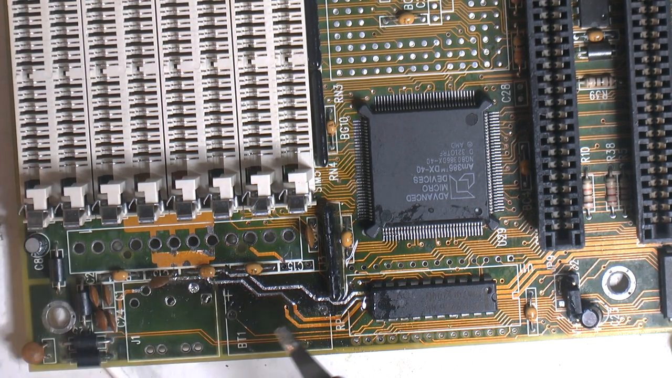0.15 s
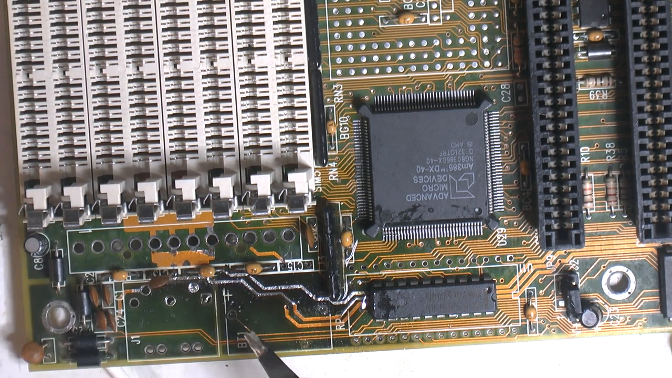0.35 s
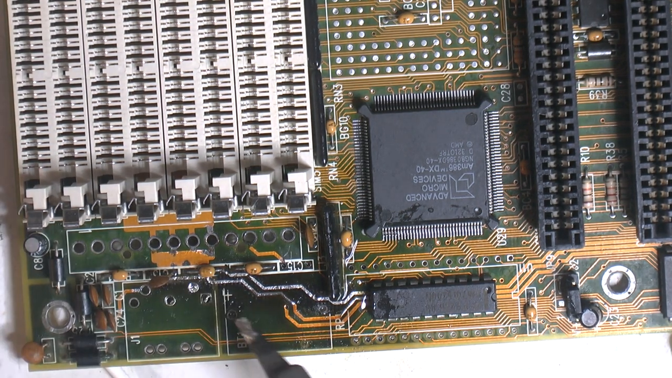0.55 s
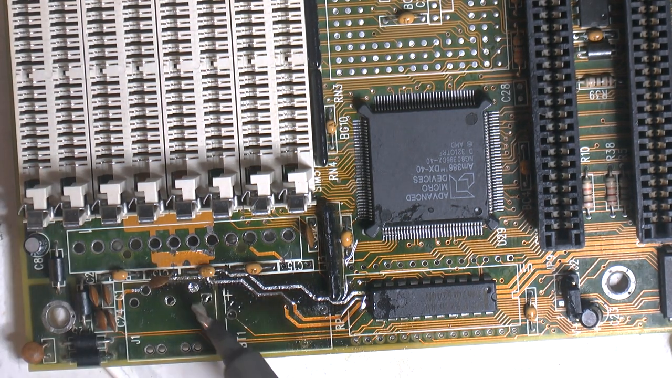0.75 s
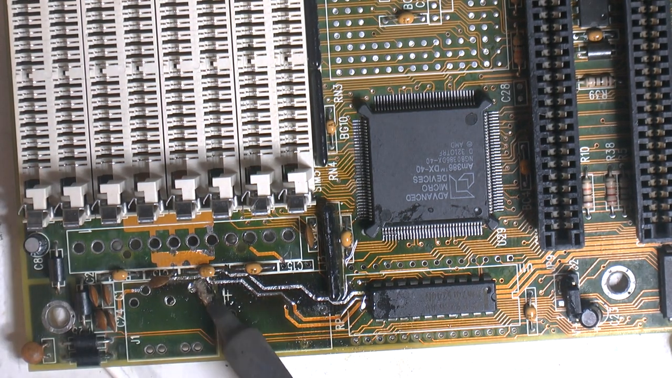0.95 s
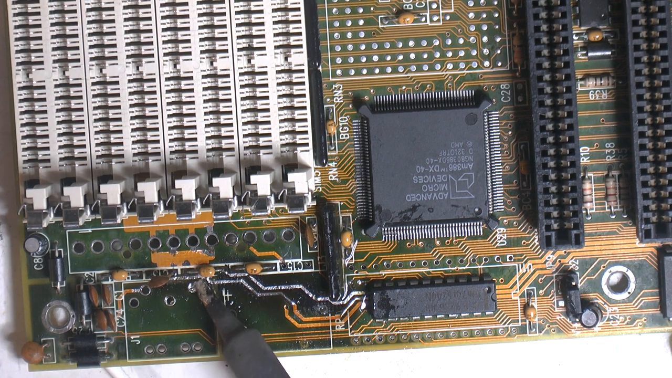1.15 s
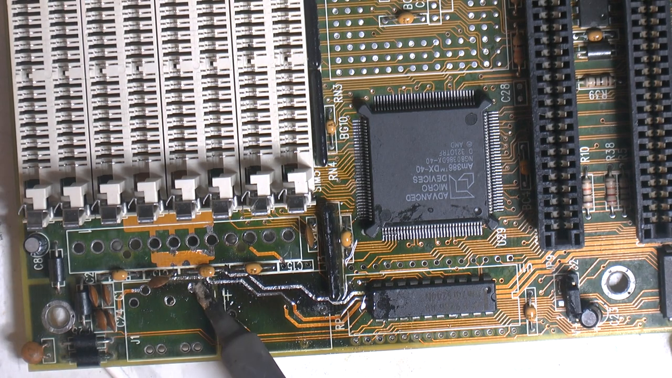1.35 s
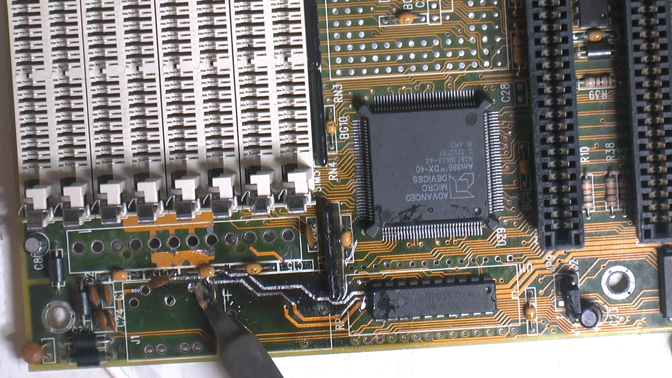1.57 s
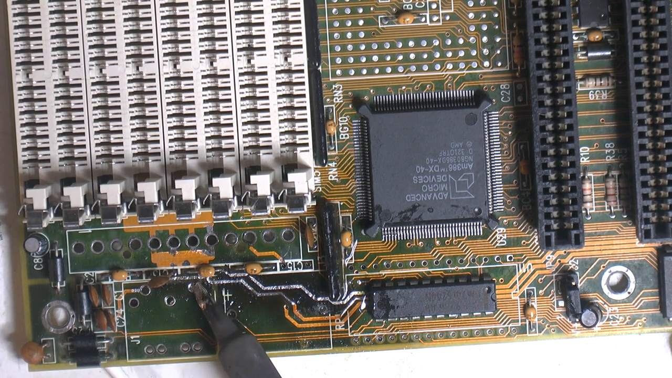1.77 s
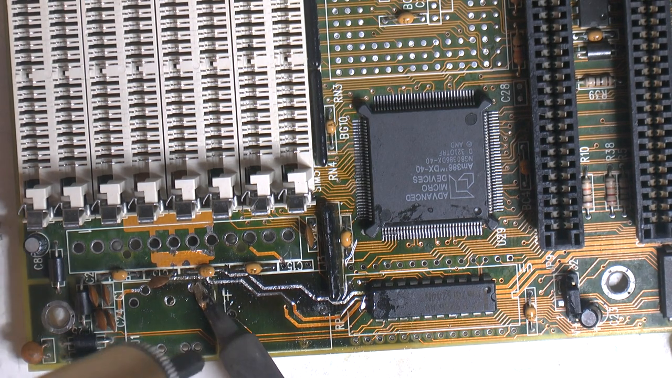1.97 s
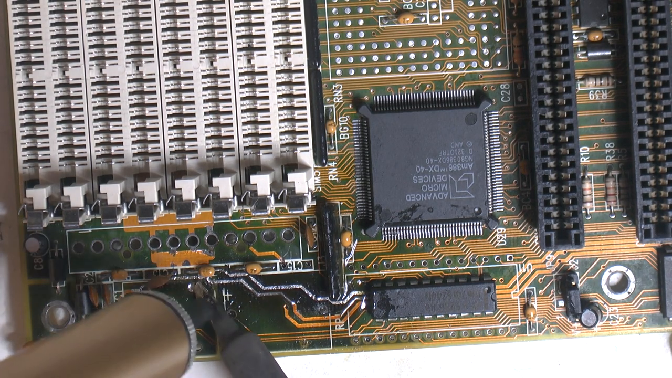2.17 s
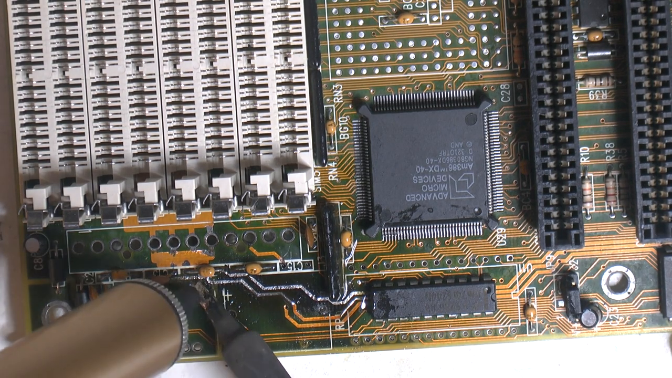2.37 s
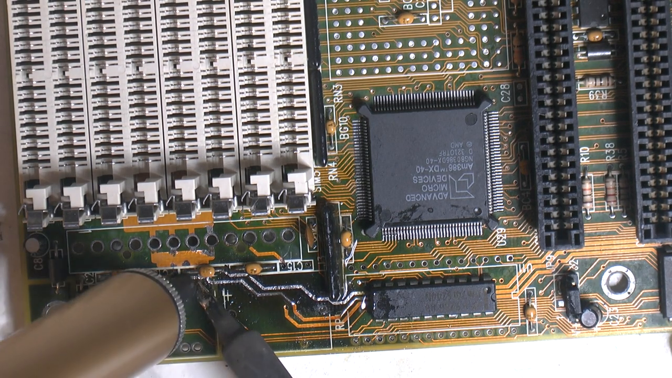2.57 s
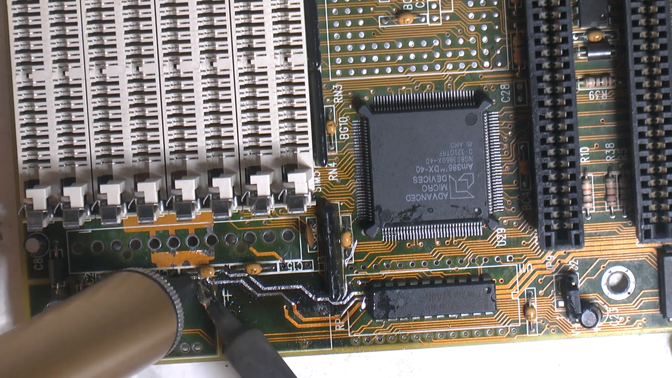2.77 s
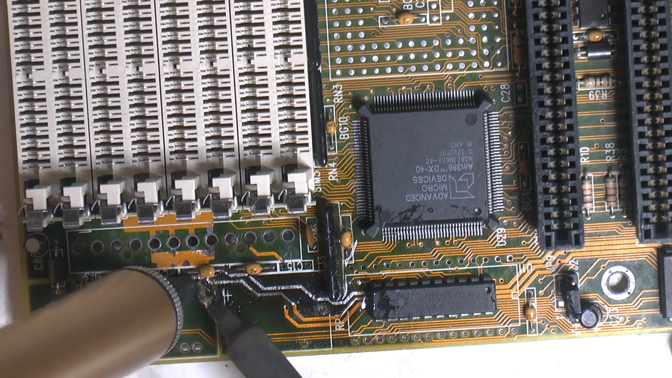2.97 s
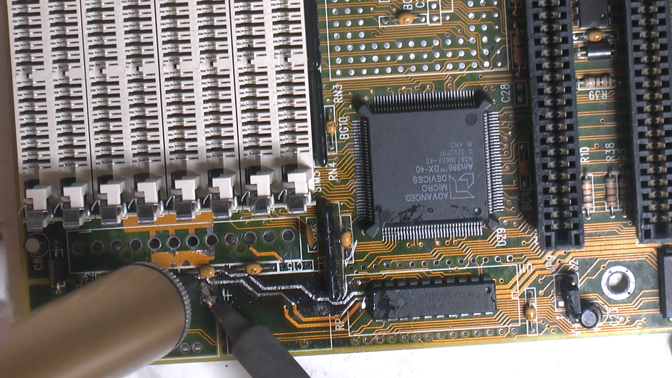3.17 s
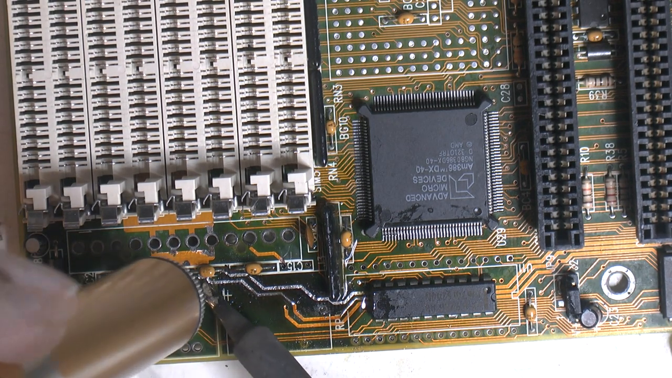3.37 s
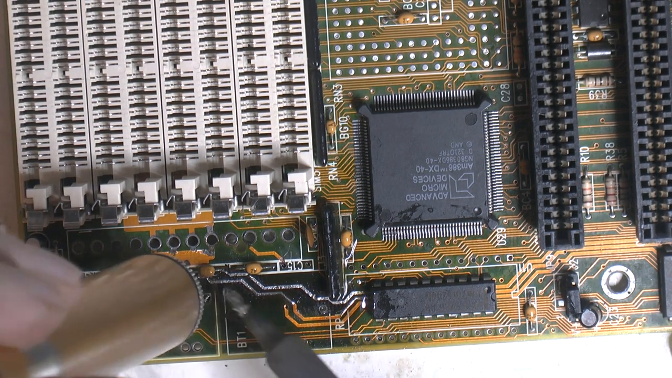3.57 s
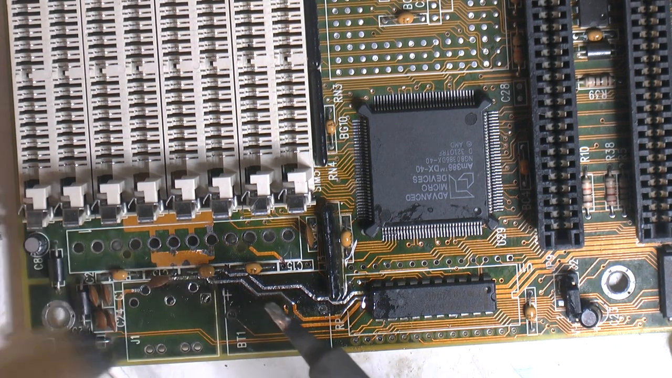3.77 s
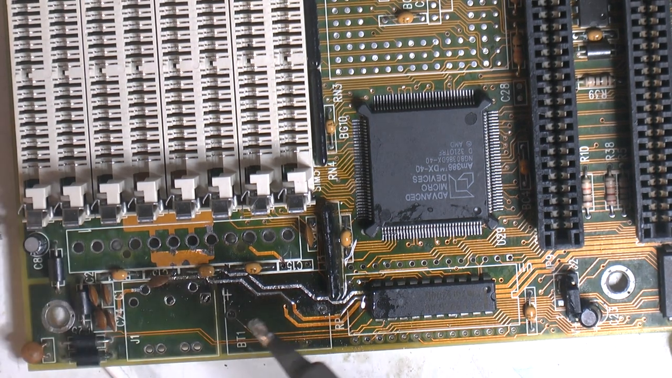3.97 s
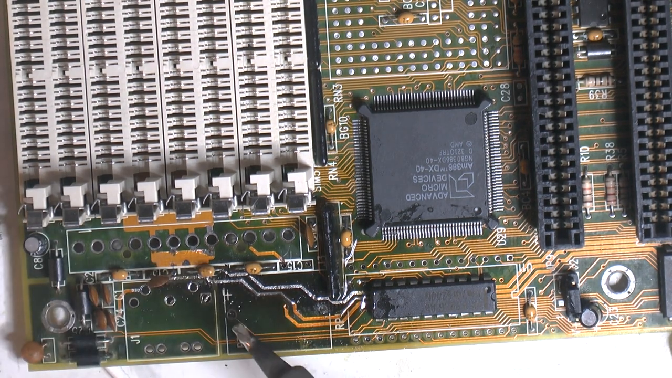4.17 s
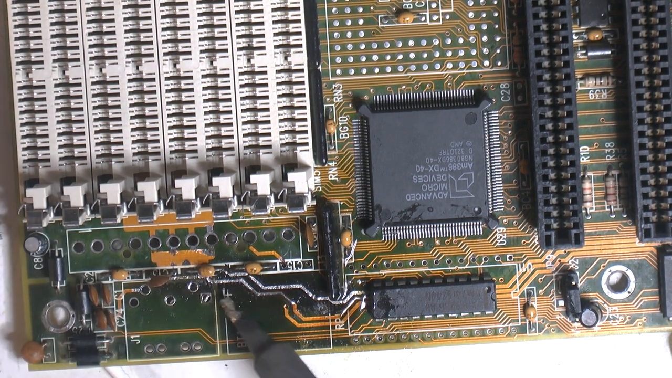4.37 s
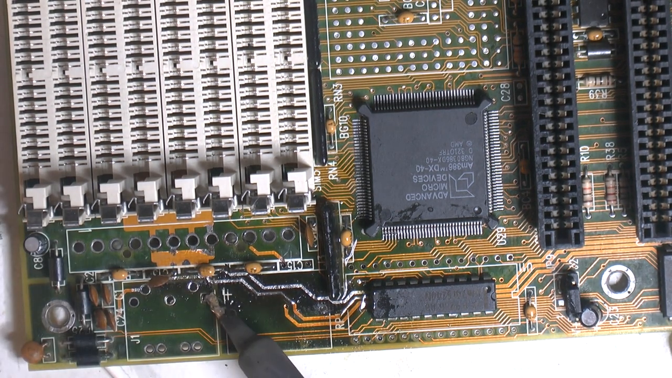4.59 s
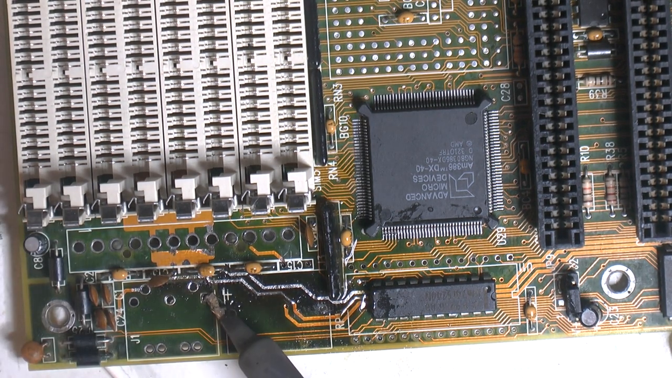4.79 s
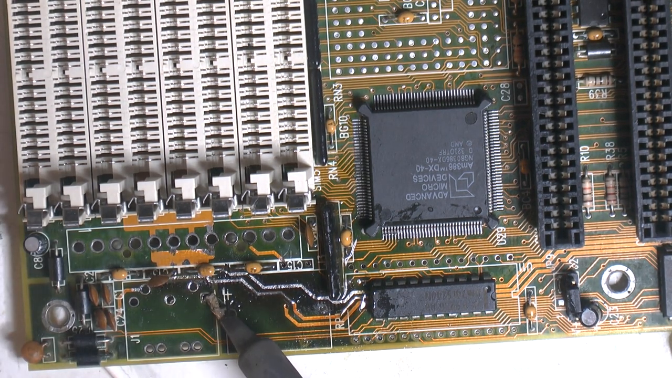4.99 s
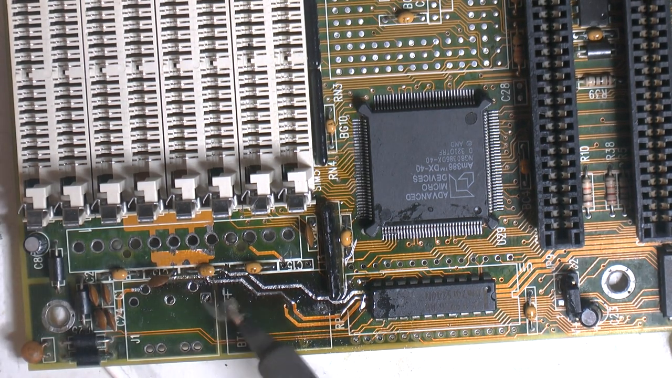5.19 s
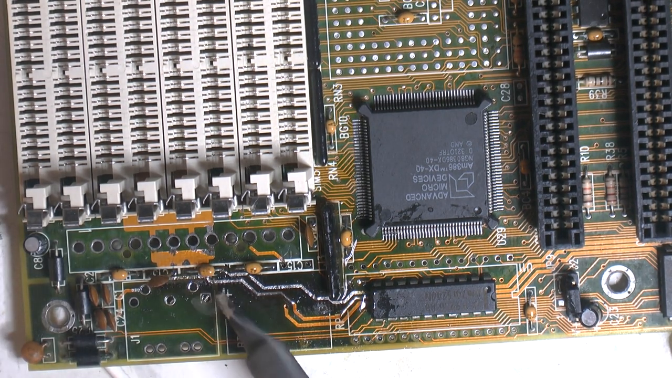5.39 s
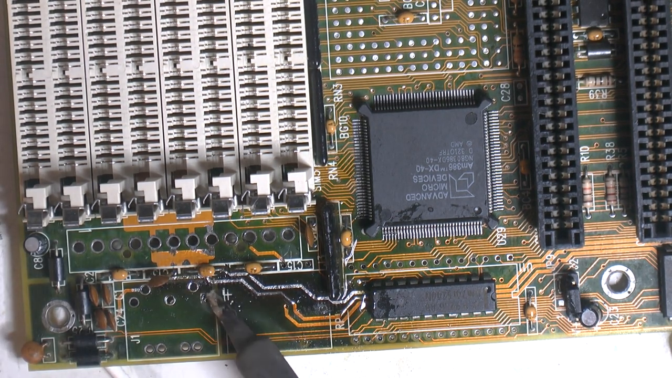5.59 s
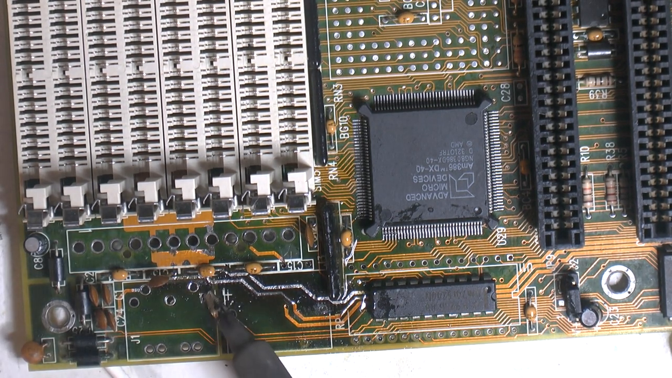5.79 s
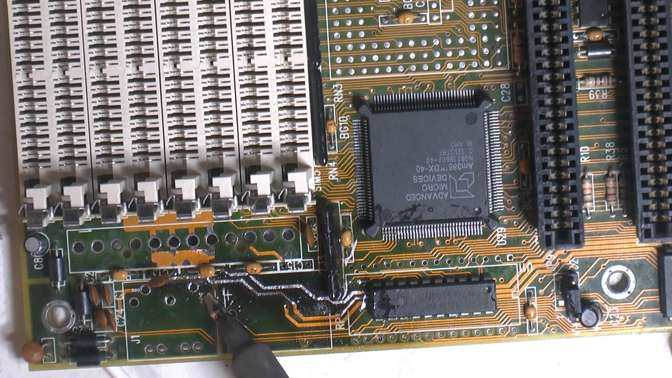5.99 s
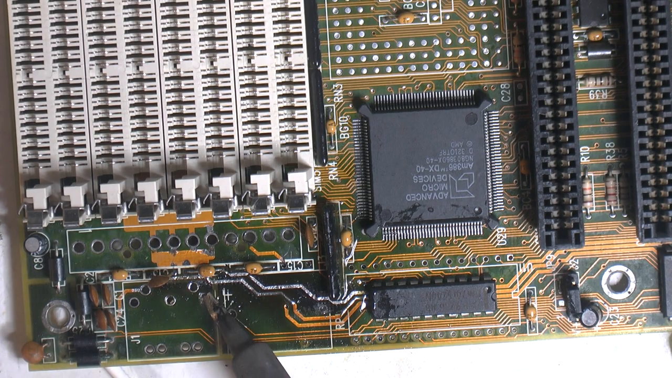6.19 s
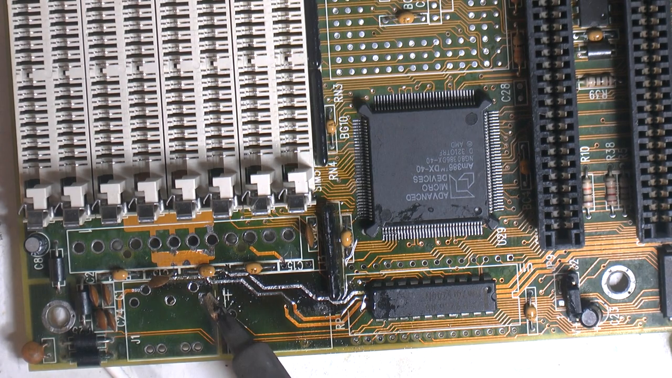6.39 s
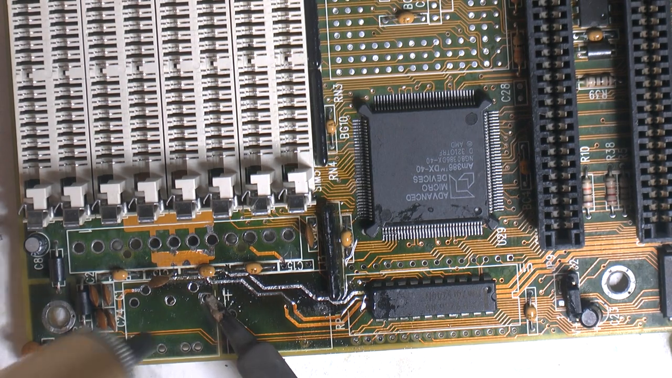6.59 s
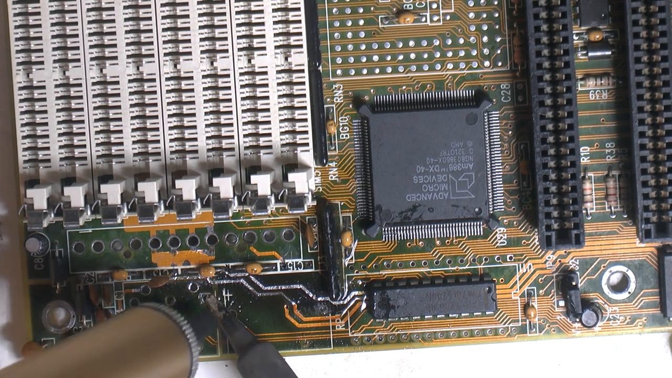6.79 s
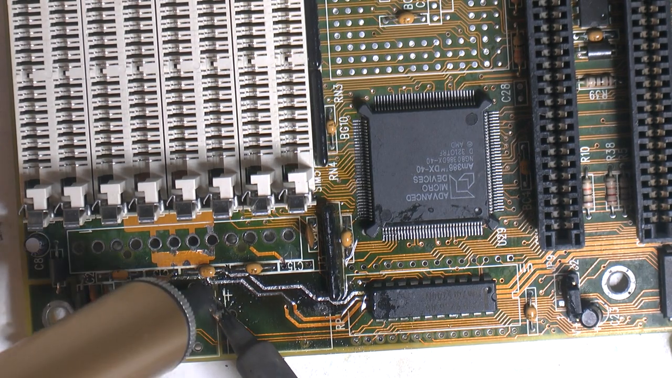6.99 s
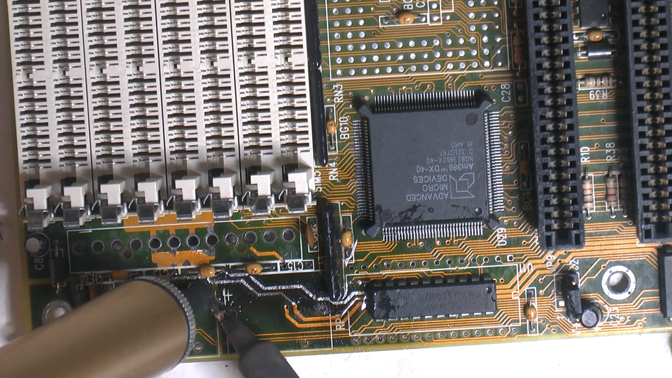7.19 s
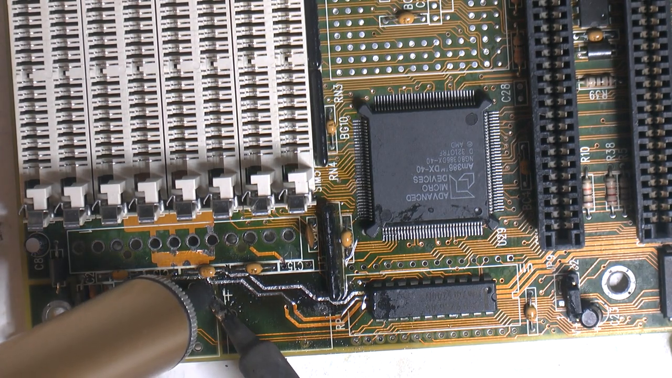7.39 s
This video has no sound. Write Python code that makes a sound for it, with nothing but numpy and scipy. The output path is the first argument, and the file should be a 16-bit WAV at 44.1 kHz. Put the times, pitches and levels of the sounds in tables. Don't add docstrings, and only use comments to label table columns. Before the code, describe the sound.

Close plastic-and-metal latch click, small tool ticks, a violent double snap with heavy bench thump, then thuds and another click, in a quiet humming room.

```python
import sys
import numpy as np
from scipy import signal
from scipy.fft import rfft, irfft
from scipy.io import wavfile
from scipy.ndimage import uniform_filter1d

SR = 44100
rng = np.random.default_rng(int(sys.argv[2]) if len(sys.argv) > 2 else 0)


def inscribe(sig):
    pcm = np.round(np.clip(np.atleast_2d(sig).T, -1, 1) * 32767)
    wavfile.write(sys.argv[1], SR, pcm.astype(np.int16))


def invert_db(x):
    u = np.asarray(x, float) / 20
    return 10 ** u


N = 328545
T = np.arange(N) / SR


def level(x, db):
    return x * invert_db(db) / np.sqrt(np.mean(x ** 2))


def band(x, hz, width):
    return signal.lfilter(*signal.iirpeak(min(hz, SR / 2.2), hz / width, fs=SR), x)


def steep(x, hz, width):
    return band(band(x, hz, width), hz, width)


def fade(t, t60):
    return np.exp(-np.log(1000) * t / t60)


def tone(hz):
    return np.sin(2 * np.pi * np.cumsum(hz) / SR)


def add(out, s, x):
    i = int(s * SR)
    out[i:i + len(x)] += x[:N - i]


def curve(rows, column):
    rows = np.array(rows)
    inside = (T >= rows[0, 0]) & (T <= rows[-1, 0])
    return inside * invert_db(np.interp(T, rows[:, 0], rows[:, column]))


def walk(rate):
    k = int(SR / rate)
    return uniform_filter1d(np.repeat(rng.standard_normal(N // k + 1), k), k)[:N]


# f/Hz, level/dB
HUM_TONES = [(193.8, -64.5), (339.1, -66), (899.0, -76.5), (1319, -82), (1798, -87.5)]
# f/Hz, level/dB
HISS_SPECTRUM = [(88, -26), (150, -6.5), (259, -10.5), (346, -9), (389, -13.5), (574, -17), (784, -17.5),
                 (898, -16.5), (1030, -19), (1550, -24), (3000, -24.5), (4180, -29.5), (15700, -34.5)]


def background():
    hum = sum(invert_db(db + 1.0 + 6.4 * walk(36)) * tone(hz + 2.3 * walk(6.7)) for hz, db in HUM_TONES)
    hz, db = np.transpose(HISS_SPECTRUM)
    f = np.fft.rfftfreq(N, 1 / SR)
    gain = invert_db(np.interp(np.log(f + 1), np.log(hz), db))
    hiss = irfft(rfft(rng.standard_normal(N)) * gain, N)
    return hum + level(hiss, -62.5)


# t/s, level/dB
HAND_WEIGHT = [(0, 14.5), (.35, -2), (.5, -6), (1.2, -3), (1.4, 9), (1.55, -3), (2.4, -3.5), (3.0, -5),
               (3.5, 0), (3.65, 18), (3.95, 10.5), (4.3, -1), (5.4, 0), (5.75, 6), (6.2, 7.5), (6.45, -4),
               (7.2, -2), (7.45, 6)]
# t/s, level/dB
FLOOR_DRONE = [(0, 4.5), (.7, 6.5), (1.1, 3), (2.0, -3), (2.4, -8), (3.5, -6.5), (4.1, 6.5), (4.7, 3.5),
               (5.1, 0), (7.45, -7.5)]
REST_LEVELS = (-49, -54.5, -52, -55.5)
HAND_FOLLOW = (0.95, 0.11, .2, .1)
DRONE_FOLLOW = (.1, 0.82, 0.081, 0.95)


def tremble():
    sway_db, sway_share, sway_lag_s = -24.5, 0.6, 0.029

    def ring(hz, width):
        return level(steep(rng.standard_normal(N), hz, width), 0)

    top = ring(132, 12) + invert_db(-8.5) * ring(215, 40) + invert_db(-17.5) * ring(460, 90)
    stand = ring(102, 12)
    leg = invert_db(2 + 1.2 * walk(5.9)) * tone(62.5 + 1.2 * walk(2.7))
    leg += invert_db(-6) * ring(55, 16)
    sway = ring(28, 14)
    hands_db = np.interp(T, *np.transpose(HAND_WEIGHT))
    drone_db = np.interp(T, *np.transpose(FLOOR_DRONE))

    swell = np.zeros(N)
    for s, db, *_ in WORK_BLOWS + PUSH_BLOWS + RECOIL_BLOWS:
        t = np.maximum(T - s, 0) / sway_lag_s
        swell = np.maximum(swell, invert_db(sway_db + sway_share * db) * t * np.exp(1 - t))

    out = swell * sway
    for rest_db, hand, drone, x in zip(REST_LEVELS, HAND_FOLLOW, DRONE_FOLLOW, (sway, leg, stand, top)):
        out += invert_db(rest_db + hand * hands_db + drone * drone_db) * x
    return out


# f/Hz, t60/s, level/dB
ROOM_BANDS = [(308, 0.33, -6.5), (700, 0.32, 7), (1390, 0.53, 1.5), (2980, .55, -2.5), (6000, .5, -3),
              (9900, 0.19, -6.5), (14000, 0.27, -1)]


def room(x):
    wall_s, wall_db = 0.03, 6
    t = T[:SR]
    tail = np.zeros(SR)
    for hz, t60, db in ROOM_BANDS:
        noise = level(band(rng.standard_normal(SR), hz, hz * 0.7), 0)
        tail += invert_db(db) * fade(t, t60) * noise * np.sqrt(hz)
    tail *= 1 - np.exp(-t / 0.0013)
    tail *= invert_db(wall_db * np.exp(-((t - wall_s) / 0.001) ** 2))
    return signal.fftconvolve(x, tail / np.sqrt(np.sum(tail ** 2)))[:N]


# t/s, peak level/dB, centre f/Hz
TOOL_TICKS = [(0.0762, -48, 7900), (0.5331, -30, 2786), (0.9938, -32, 4870), (1.3294, -59, 3570),
              (1.722, -48.5, 4790), (2.6434, -41, 7340), (2.8517, -59, 3140), (3.1283, -47, 7400),
              (3.1762, -49.5, 5530), (3.9972, -51, 3030), (4.157, -48, 3950), (4.1769, -42.5, 4800),
              (4.349, -50, 2930), (4.4169, -34, 3860), (4.4687, -31, 3820), (5.3981, -49, 7700),
              (5.5582, -45.5, 4500), (5.9372, -43.5, 6410), (6.0702, -54.5, 2950), (6.2294, -53.5, 2950),
              (6.809, -54.5, 3040)]


def ticks():
    out, t = np.zeros(N), T[:SR // 2]
    for s, db, hz in TOOL_TICKS:
        x = steep(rng.standard_normal(len(t)) * fade(t, 0.015), hz, hz * 1.5)
        add(out, s, invert_db(db) * x / np.abs(x).max())
    return out


# t/s, peak level/dB, f/Hz, t60/s
METAL_RINGS = [(2.643, -60, 7340, .04), (3.4797, -54, 4800, .015), (3.4797, -52, 7370, .02),
               (3.4797, -54, 6000, .012), (3.4797, -56, 9800, .012), (3.54, -33, 5400, .35),
               (3.54, -36, 4300, .3), (4.123, -58, 7950, .03), (4.178, -57, 4780, .03),
               (4.4195, -42, 3860, .2), (4.4195, -50, 9000, .08), (4.4195, -42, 5500, .02),
               (4.5575, -34, 6450, .2), (4.5575, -34, 6650, .3), (5.399, -62, 7630, .05)]


def metal_rings():
    out, t = np.zeros(N), T[:SR // 2]
    for s, db, hz, t60 in METAL_RINGS:
        onset = 1 - np.exp(-t / 0.00045)
        add(out, s, invert_db(db) * fade(t, t60) * onset * np.sin(2 * np.pi * hz * t))
    return invert_db(5.0 * walk(200)) * out


# start t/s, length t/s, first level/dB, last level/dB, treble level/dB
RUBS = [
    (0.0, .14, -50, -73.5, -23.5),
    (0.43, 0.11, -63, -56, 0.5),
    (0.521, .095, -44.5, -45, -7.5),
    (3.184, .08, -65, -81, -6),
    (4.041, .11, -74, -67.5, -5),
    (4.384, .03, -67, -59.5, -8.5),
    (4.414, .137, -50.5, -44, -5),
    (5.344, .055, -69, -65, -14),
    (5.394, .075, -69, -82, 0),
]
# f/Hz, width f/Hz, level/dB
RUB_MODES = [(2400, 840, -2.5), (3300, 880, 1.5), (4140, 960, 0.5), (6550, 1500, 1)]


def slides():
    rub = rng.standard_normal(N) * invert_db(3.8 * walk(150))
    body = level(sum(invert_db(d) * band(rub, f, w) for f, w, d in RUB_MODES), -2)
    treble = level(band(rub, 12000, 7000), 0.99)
    out = np.zeros(N)
    for s, length, first_db, last_db, treble_db in RUBS:
        envelope = curve([(s, first_db), (s + length, last_db)], column=1)
        attack = np.clip((T - s) / 0.012, 0, 1)
        out += envelope * attack * (body + invert_db(treble_db) * treble)
    return out


# t/s, level/dB
SUCTION = [
    (3.4975, -49),
    (3.501, -29),
    (3.506, -16),
    (3.536, -19.5),
    (3.545, -22),
    (3.56, -31.5),
]


def suction():
    return curve(SUCTION, column=1) * level(band(rng.standard_normal(N), 8500, 9000), 0)


# f/Hz, level/dB, t60/s
STAND_MODES = [(108.06, 5, 0.22), (105.18, -14, 0.5)]
TOP_MODES = [(141.6, 0, 0.32)]
UPPER_MODES = [(194.25, 2.5, .15), (216.9, -1, .13)]
KNOCK_MODES = [(331, -7.5, 0.12), (419, -3, 0.051), (479, 0.5, 0.032), (498.3, 1.5, 0.011), (595, -12, .04)]
MODE_RISE = (0.017, 0.0092, 0.0081, 0.0025)
# f/Hz, width f/Hz, level/dB
BOARD_MODES = [(766, 150, 7), (893, 83, 2), (900, 500, -0.5), (1430, 130, -3), (1790, 390, -7.5)]


def thuds(rows, sign, soft, loose_db):
    (bench, board), t = np.zeros((2, N)), T[:SR // 2]
    groups = STAND_MODES, TOP_MODES, UPPER_MODES, KNOCK_MODES
    for s, db, weight_db, place, hard_db in rows:
        turn = np.clip(place, 0, 1) * np.pi / 2
        weight = invert_db(weight_db)
        gains = weight * np.cos(turn), weight * np.sin(turn), 1, invert_db(hard_db)
        for gain, modes, rise in zip(gains, groups, MODE_RISE):
            ring = sum(invert_db(d) * fade(t, t60) * np.sin(2 * np.pi * f * t) for f, d, t60 in modes)
            onset = 1 - np.exp(-(t / (soft * rise)) ** 2)
            add(bench, s, sign * invert_db(db) * gain * onset * ring)
        chatter = (t == 0) + 0.17 * rng.standard_normal(len(t)) * fade(t, 0.044)
        x = steep(sum(invert_db(d) * band(chatter, f, w) for f, w, d in BOARD_MODES), 1400, 2400)
        add(board, s, invert_db(db + hard_db + loose_db) * x / np.abs(x).max())
    return np.array([bench, board])


# t/s, level/dB, weight level/dB, place [0 at the stand - 1 mid top], hardness level/dB
WORK_BLOWS = [(0.0, -38, 10.5, 0.67, 1), (0.764, -56, 5, 0.27, 25), (0.995, -21, 2, 0.42, -2),
              (1.329, -40, 0, .22, -11), (1.724, -45.5, 1.5, .06, -6), (3.136, -34.5, -20, .37, -20.5),
              (3.764, -32.5, 8.5, 0.8, -28), (4.241, -46, -11, .57, -31.5), (5.17, -37.5, 0.5, 0.84, -8.5),
              (5.2, -38, 0.5, .37, -5), (5.557, -22.5, 0.3, 0.33, -5.5), (5.7, -37, -8, .23, -18),
              (5.735, -30.5, -13, .16, -25), (5.924, -31.5, -17, .66, -18), (5.941, -28.5, -5, .72, -8),
              (6.077, -32, -17, .16, -26), (6.641, -24.5, -19, .6, -19), (7.02, -39, 14, 0.41, -22),
              (7.097, -30, -1.5, 0.93, -26)]


def work_thuds():
    return thuds(WORK_BLOWS, 0.76, soft=0.93, loose_db=-6.5)


PUSH_BLOWS = [(2.607, -44, 24, 1, 9), (2.644, -22.5, -10, 0.12, -20), (2.681, -34.5, -0.5, 0.51, -15),
              (4.469, -29, -12.5, 0.72, -6), (4.499, -27.5, -9.5, 1, -5), (4.42, -25.5, -4, 0.54, 2),
              (4.444, -22.5, -30, .5, -14.5), (4.54, -18, -2.5, 0.69, -5.5), (4.611, -4.5, -3.5, .76, -0.5),
              (4.68, -1, -10, 0.055, -3), (4.719, -1, -23, 0.56, 2.5), (4.732, -0.5, -16.5, 0.084, -7)]


def cocking_thuds():
    return thuds(PUSH_BLOWS, 0.91, soft=0.93, loose_db=-16)


RECOIL_BLOWS = [
    (3.5012, -12, -1, .8, -8.5),
    (3.5067, -1, 10, .24, -11),
    (3.5215, -0.5, -6, .67, -18),
    (3.5377, 3, -2.5, .76, -4.5),
    (3.5547, 0.5, -7, .89, -11.5),
    (3.5664, 0, -8.5, .77, -14.5),
    (3.58, -31, 3.5, .97, -5.5),
]


def recoil_thuds():
    return thuds(RECOIL_BLOWS, -0.69, soft=0.31, loose_db=-7.5)


def clicks(rows, modes, room_db):
    out, t = np.zeros((2, N)), T[:SR // 10]
    thin = signal.butter(3, 800, "high", fs=SR, output="sos")
    for s, db, rattle, crack_db, crack_hz in rows:
        def barrel(blow, widen):
            ring = level(sum(invert_db(d) * band(blow, f, widen * w) for f, w, d in modes), 0)
            crack = level(steep(blow, crack_hz, 2.5 * crack_hz), crack_db)
            return signal.sosfilt(thin, ring + crack)

        x = barrel(rng.standard_normal(len(t)) * np.exp(-t / rattle), widen=0.53)
        x *= invert_db(db + 1.5) / np.abs(x).max()
        add(out[0], s, x)
        around = barrel(1.0 * (t == 0), widen=1.6)
        same_energy = np.sqrt(np.sum(x ** 2) / np.sum(around ** 2))
        add(out[1], s, invert_db(room_db) * around * same_energy)
    return out


# t/s, peak level/dB, rattle t/s, broad crack level/dB, crack centre f/Hz
LATCH_CLICKS = [
    (0.6200, 1, 0.0025, -9, 7480),
    (0.7647, -13.5, 0.0022, 3.5, 3000),
]
# f/Hz, width f/Hz, level/dB
LATCH_BARREL = [(1010, 400, -20), (2480, 290, -0.5), (3150, 200, -8), (3640, 140, -12), (4566, 310, -1.5),
                (6040, 150, -3.5), (6720, 750, -3.5), (7780, 180, -5), (8200, 67, -8.5), (9600, 200, -11.5),
                (12640, 150, -21.5), (15000, 530, -12)]


def latch_clicks():
    return clicks(LATCH_CLICKS, LATCH_BARREL, room_db=-13)


CATCH_CLICKS = [
    (4.5571, -1.5, .0016, -5, 4950),
    (4.7168, -21, .002, -3, 6000),
]
# f/Hz, width f/Hz, level/dB
CATCH_BARREL = [(1020, 680, -12), (2140, 100, -10), (2835, 500, -2), (3870, 83, -3), (4750, 300, -7),
                (6000, 136, -5), (6690, 300, -1), (8003, 93, -9), (10747, 140, -19)]


def catch_clicks():
    return clicks(CATCH_CLICKS, CATCH_BARREL, room_db=-10)


SNAP_CLICKS = [
    (3.5056, 2.5, 0.0012, 1.2, 8156),
    (3.5372, 12, 0.0045, 1.3, 7600),
    (3.7525, -24, 0.0017, 1.5, 7800),
]
# f/Hz, width f/Hz, level/dB
SNAP_BARREL = [(1200, 900, -15.5), (2600, 280, -6), (4070, 340, 8), (5240, 250, 6), (6465, 400, 0),
               (7700, 1900, 5.5), (9757, 1500, -1.5)]


def snap_clicks():
    return clicks(SNAP_CLICKS, SNAP_BARREL, room_db=-18)


def scene():
    near, feed = latch_clicks() + catch_clicks() + snap_clicks()
    small = ticks() + metal_rings() + slides() + suction()
    bench, board = work_thuds() + cocking_thuds() + recoil_thuds()
    knocks = signal.sosfilt(signal.butter(2, 350, "high", fs=SR, output="sos"), bench)
    wet = room(invert_db(5.5) * feed + invert_db(-7) * small + invert_db(-8) * knocks + invert_db(-5) * board)
    port = signal.butter(2, 13400, fs=SR, output="sos")
    air = signal.sosfilt(port, near + small + board + wet)
    return (air + bench + tremble() + background())[None]


def top_cut(x):
    return signal.sosfilt(signal.butter(12, 15830, fs=SR, output="sos"), x)


def record(dry):
    mix = np.clip(dry, -1, 1)
    return top_cut(mix)


dry = scene()
out = record(dry)
inscribe(out)
```